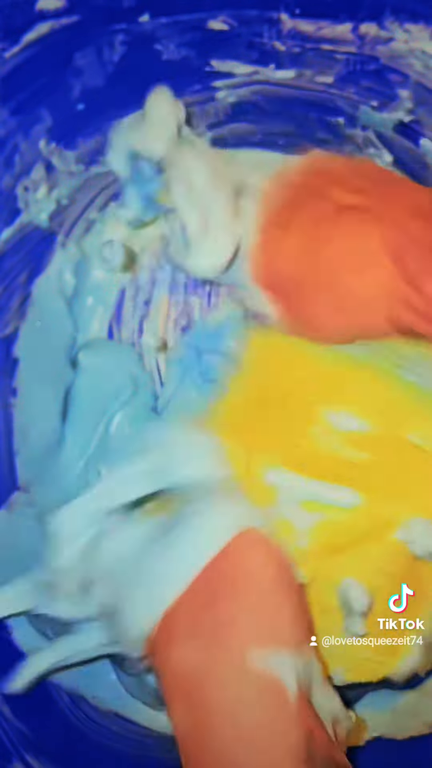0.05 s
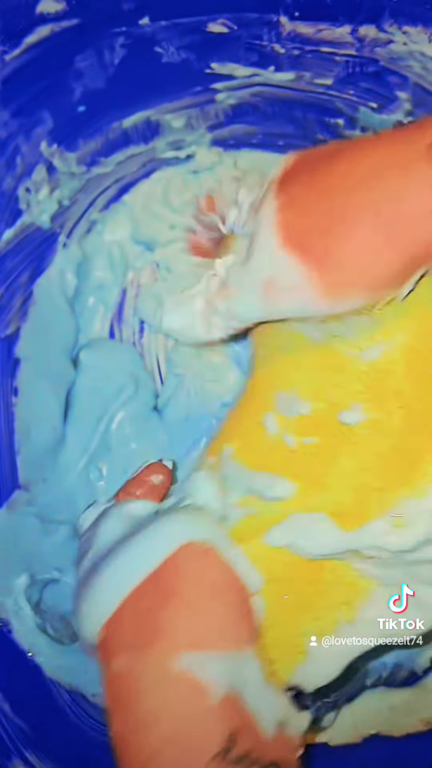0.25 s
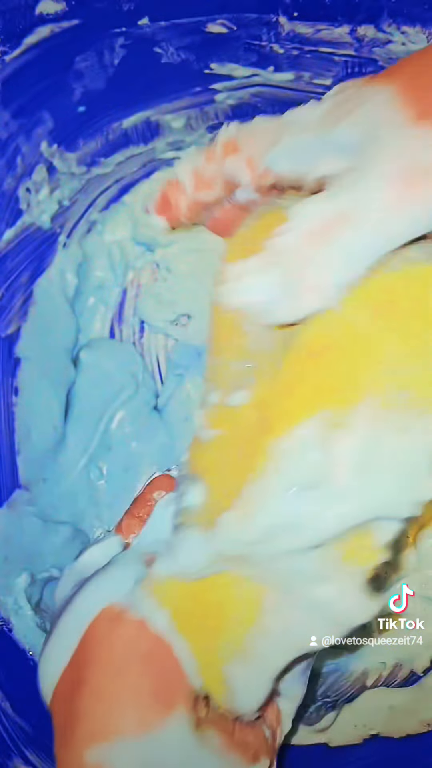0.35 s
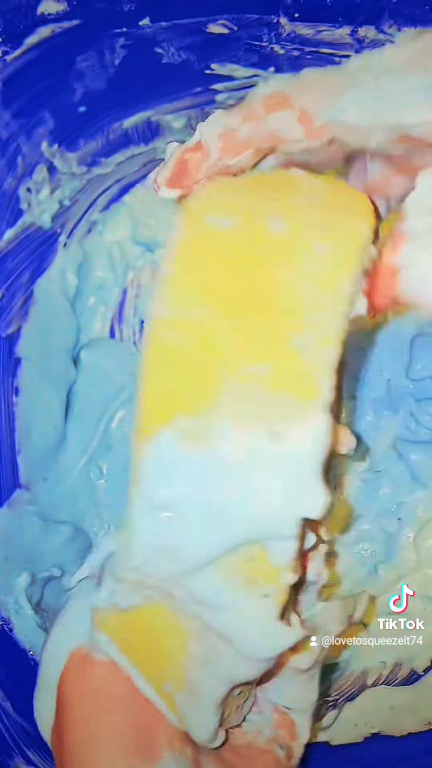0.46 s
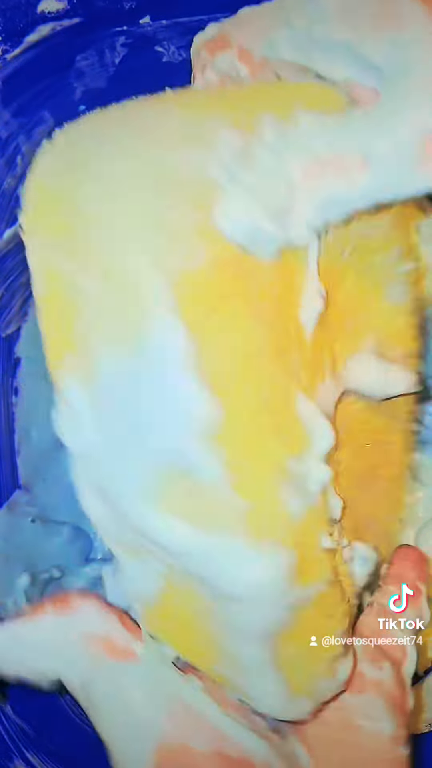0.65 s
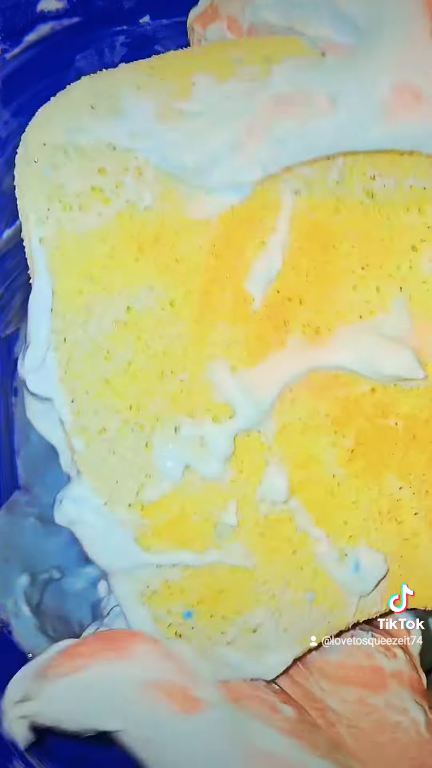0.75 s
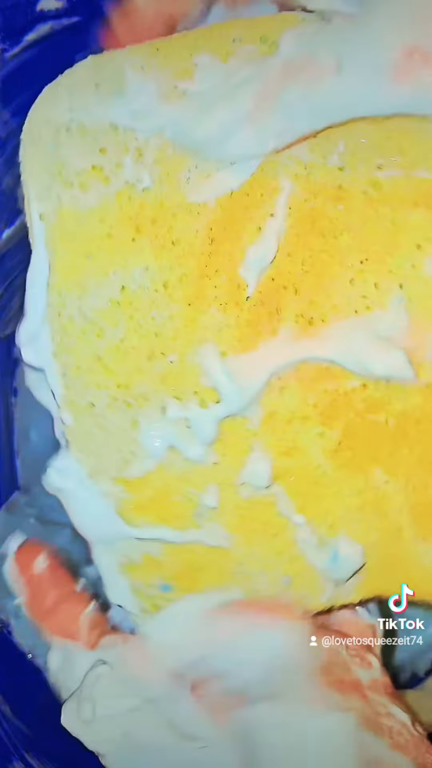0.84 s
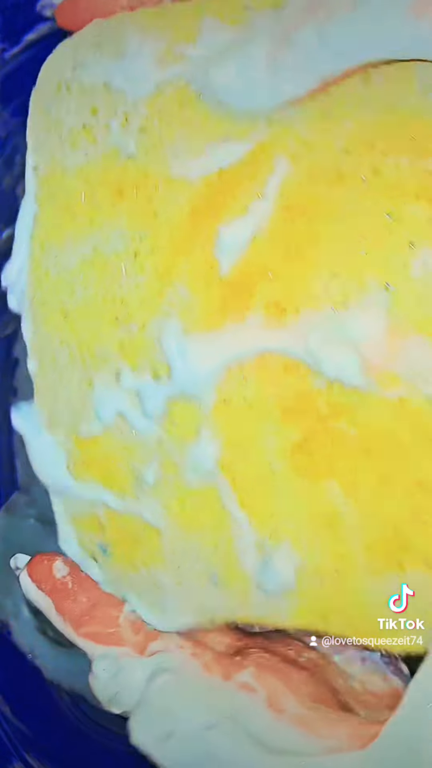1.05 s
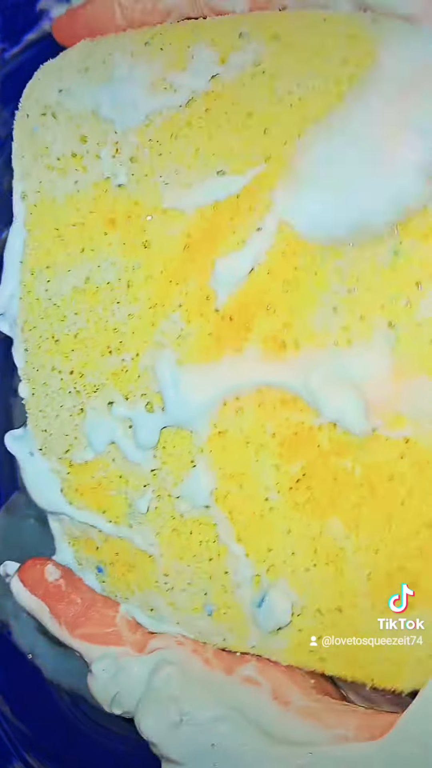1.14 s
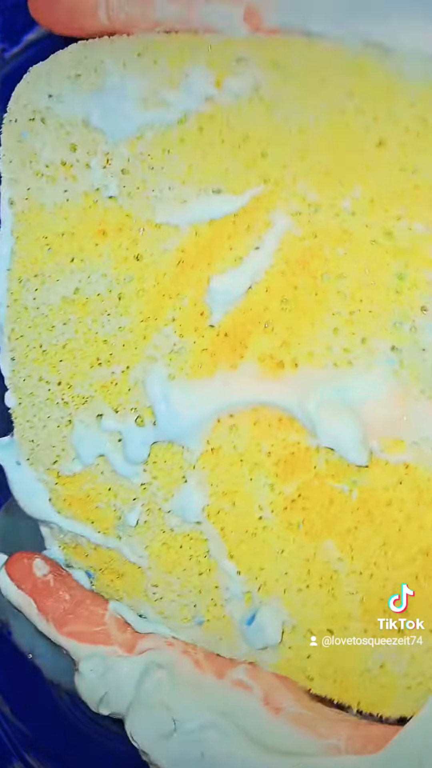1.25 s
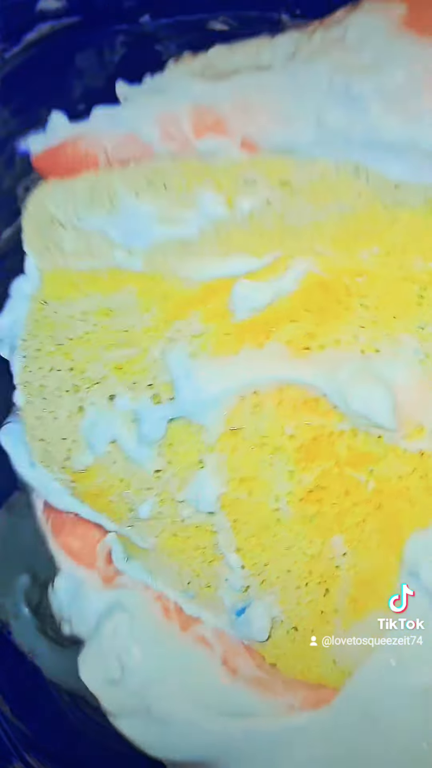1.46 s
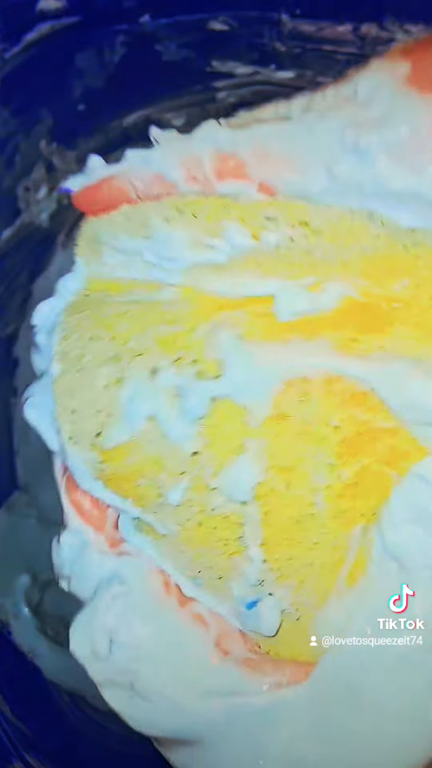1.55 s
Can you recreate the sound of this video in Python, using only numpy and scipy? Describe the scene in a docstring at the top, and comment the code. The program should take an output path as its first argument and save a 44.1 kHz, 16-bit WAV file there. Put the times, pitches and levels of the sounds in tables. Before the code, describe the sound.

Hands squeeze a sudsy sponge with one loud squelch, followed by hollow knocks and soft fizzing.

```python
"""Soapy sponge in a plastic basin.

Wet hands squeeze the sponge close to the microphone: one loud squelch, plops, a thud as it hits bottom.
As the sponge is lifted and turned, the basin rocks and knocks ever more softly; the room booms with it.
Fingers pat; foam fizzes with each move and swells as the next squeeze begins. The room hums faintly."""
import sys
import numpy as np
from scipy import signal
from scipy.fft import rfft, irfft
from scipy.io import wavfile
from scipy.ndimage import uniform_filter1d

SR = 44100
rng = np.random.default_rng(int(sys.argv[2]) if len(sys.argv) > 2 else 0)


def file_out(sig):
    """Save sig as 16-bit WAV at sys.argv[1]."""
    # one column per channel
    cols = np.atleast_2d(sig).T
    # limit, then scale
    lim = np.clip(cols, -1, 1)
    pcm = np.round(lim * 32767).astype(np.int16)
    wavfile.write(sys.argv[1], SR, pcm)


N = 70560
TIME_S, FREQ_HZ = np.arange(N) / SR, np.fft.rfftfreq(N, 1 / SR)

# Flow of suds through the fingers. Each row: time in seconds, spray in dB, gurgle in dB.
SUDS_FLOW = [(.2, -91, -101), (.222, -58, -64), (.233, -40, -36.5), (.243, -35.5, -37), (.256, -30, -36),
             (.268, -36, -33.5), (.28, -40, -37), (.295, -53.5, -39.5), (.318, -53.5, -50),
             (.34, -60.5, -73), (.40, -98, -79.5)]
# Spray and gurgle spectra. Each row: frequency in Hz, relative level in dB.
SPRAY_SPECTRUM = [(300, -34.5), (800, 1), (1400, 6.5), (2400, 6.5), (4000, 7), (5600, 9.5), (7500, 3),
                  (13000, 5.5), (16000, -11)]
GURGLE_SPECTRUM = [(60, -32), (130, -7), (230, -9), (330, -2), (400, -1), (490, -7.5), (590, -6.5),
                   (720, -6.5), (1000, -15), (1500, -15.5), (3000, -26)]
# Air pockets bursting; thin high spits of air. Each row: start in seconds, level in dB, decay in seconds.
POP_BURSTS = [(.2032, -41, .0018), (.2065, -31.5, .00065), (.231, -23, .0009), (.247, -27, .0008),
              (.2535, -22, .0014), (.2562, -24, .0008), (.2625, -21, .0012), (.2697, -23, .0007),
              (.2738, -29, .001), (.2898, -19, .0008), (.3133, -32, .0012)]
SPIT_BURSTS = [(.2028, -31, 0.0029), (1.189, -38.5, 0.0019)]
# Their spectra. Each row: frequency in Hz, relative level in dB.
POP_SPECTRUM = [(200, 5), (900, 8.5), (2500, -5), (5500, 6), (8000, -2), (13000, 1), (16000, 6)]
SPIT_SPECTRUM = [(500, -47), (8000, -7.5), (12500, 0.5), (16000, 0)]
# Basin shaking under the hands. Each row: time in seconds, level in dB.
SHAKE_LEVEL = [(0, -61.5), (.05, -64), (.09, -92), (.21, -72), (.25, -40), (.305, -33), (.33, -37),
               (.37, -51.5), (.45, -43.5), (.85, -62), (.95, -70), (1.15, -69), (1.2, -61), (1.28, -75)]
# Its spectrum. Each row: frequency in Hz, relative level in dB.
SHAKE_SPECTRUM = [(30, -36), (48, -8.5), (66, -0.5), (88, -11), (118, 3), (160, -21.5), (220, -1),
                  (400, -42), (1000, -57)]

# Basin knocks. Each row: start in seconds, relative ring in dB, relative slap in dB, pitch factor.
BASIN_KNOCKS = [(.293, -11, -6, .99), (.317, -14.5, -17, .96), (.394, 1, 4, 1.01),
                (0.4571, -1.5, -5.5, 1.02), (0.5576, -6, -7, 1.02), (0.6458, -11, -13.5, 1.02),
                (0.7157, -13.5, -15, 1.024), (0.7712, -21, -21.5, 1.04)]
# The basin's hollow ring and the room's low boom.
# Each row: base frequency in Hz, relative level in dB, T60 in seconds.
KNOCK_RESONANCES = [(60, -18.5, 0.59), (112.2, 3.5, 0.15), (135.3, 5.5, 0.066), (173, 10, 0.045),
                    (205.7, 0.5, 0.14), (357.5, -11.5, 0.061), (500, -11.5, 0.043), (620.4, -23.5, 0.091),
                    (1043, -35, .13), (1201, -30.5, 0.14)]
# Wet slap spectrum. Each row: frequency in Hz, relative level in dB.
SLAP_SPECTRUM = [(150, -6), (400, -2.5), (650, -0.5), (850, -8), (1200, -8), (1700, -20), (3000, -21.5),
                 (8000, -50)]
# Reflections off nearby surfaces. Each row: delay in seconds, gain.
REFLECTIONS = [(.0046, 0.79), (0.022, 0.45)]

# Air pocket plops and one low thud. Each row: start in seconds, pitch in Hz, level in dB, decay in seconds.
PLOPS_AND_THUD = [(.229, 406, -32.5, 0.0049), (0.2514, 391, -23.5, .011), (.2545, 633.5, -32.5, 0.0083),
                  (.2745, 810, -24.5, 0.0026), (0.284, 420, -40, 0.0052), (0.307, 116, -28.5, 0.024),
                  (0.3911, 529, -36, 0.0063)]
# Finger pats. Each row: start in seconds, level in dB, decay in seconds, cavity in Hz, cavity in dB.
FINGER_PATS = [(0.201, -45, 0.0081, 232, -53), (0.382, -45.5, 0.0043, 486, -54),
               (0.974, -57.5, 0.012, 352, -52.5), (1.052, -48.5, 0.0086, 751, -59)]
# Pat spectrum. Each row: frequency in Hz, relative level in dB.
PAT_SPECTRUM = [(120, 4), (350, 2), (550, 3), (780, -1), (1500, -2), (2400, -6.5), (5000, -13),
                (12000, -25)]

# Fizzing foam; sponge pressed again. Each row: time in seconds, level in dB.
FIZZ_LEVEL = [(0, -58), (.09, -63.5), (.19, -52.5), (.22, -54.5), (.31, -50), (.375, -71.5), (.44, -64.5),
              (.51, -59.5), (.55, -63.5), (.62, -59.5), (.655, -55), (.69, -59), (.77, -57), (.85, -59),
              (.908, -71), (.976, -53.5), (1.04, -63.5), (1.104, -73.5), (1.175, -63.5), (1.235, -55.5),
              (1.30, -68.5), (1.35, -69.5), (1.46, -57), (1.545, -48), (1.6, -47)]
PRESS_LEVEL = [(1.38, -102), (1.47, -69), (1.54, -55), (1.6, -59)]
# Single larger bubbles bursting. Each row: start in seconds, level in dB.
BUBBLE_TICKS = [(.075, -61), (0.399, -47), (.530, -63), (1.1188, -50), (1.164, -42.5), (1.198, -41.5),
                (1.22, -39), (1.319, -47.5), (1.356, -49.5)]
# Fizz, press and tick spectra. Each row: frequency in Hz, relative level in dB.
FIZZ_SPECTRUM = [(200, -40), (500, -6.5), (900, -2), (1600, 0), (2500, 0), (3800, 4), (5500, 3),
                 (7500, -0.5), (13000, -1), (16000, -2)]
PRESS_SPECTRUM = [(200, -58), (450, -27), (750, 1), (1600, -3.5), (2800, -1.5), (6000, -7.5)]
TICK_SPECTRUM = [(500, -7), (2500, -11.5), (5000, 7.5), (8000, 2), (13000, 0), (16000, 8.5)]

# Room hum partials; rumble spectrum. Each row: frequency in Hz, relative level in dB.
HUM_PARTIALS = [(60, -74), (120, -68), (149, -68)]
RUMBLE_SPECTRUM = [(20, -39), (42, -15.5), (68, 4), (95, -13), (125, -7), (155, -3.5), (205, -19),
                   (350, -17.5), (600, -34), (2000, -40), (16000, -67)]
# Swell of hum and rumble. Each row: time in seconds, gain in dB.
DRONE_GAIN = [(.1, -5.5), (.3, -1.5), (1.2, 0), (1.5, -2.5)]

# Microphone port response. Each row: frequency in Hz, left gain in dB, right gain in dB.
PORT_RESPONSE = [(95, -0.7, 2.26), (406, 0.8, 2), (1330, -0.83, 2.5), (4500, -1.5, 0.7), (6840, -1.5, 5),
                 (7360, 3, 12.5), (8260, -2.5, 8.5), (8830, -18, 0.5), (10300, -17, -8), (10830, -5.5, -13),
                 (11650, 2, 0.5), (12430, 12, 1), (13100, 12, 4.5), (13500, 13.5, 5.5), (14500, -1.5, 5),
                 (16100, 10, -9)]
# Likeness of the two ports. Each row: frequency in Hz, correlation from 0 to 1.
PORT_CORRELATION = [(60, 0.96), (300, 0.91), (900, 0.57), (2000, 0.087), (3000, 0.12), (16000, 0.052)]


def squelch():
    """Suds spray, pop, spit and gurgle out of the sponge while the push shakes the basin."""
    spray = bubbles(per_s=1100, spread_db=4.5, burst_s=0.0001, wash=0.2) * level(SUDS_FLOW)
    spray = walls(colour(spray, SPRAY_SPECTRUM), gain=0.76, max_delay_s=0.008)
    gurgle = bubbles(per_s=850, spread_db=1, burst_s=0.0006, wash=0.435) * level(SUDS_FLOW, column=2)
    gurgle = room(colour(gurgle, GURGLE_SPECTRUM), wet_db=-14, t60_s=0.46)
    pops = colour(noise() * bursts(POP_BURSTS, rise_s=0.00031), POP_SPECTRUM)
    spits = colour(noise() * bursts(SPIT_BURSTS, rise_s=0.00055), SPIT_SPECTRUM)
    shake = unit_rms(colour(noise(), SHAKE_SPECTRUM)) * level(SHAKE_LEVEL)
    return room(spray + pops + spits, wet_db=-26, t60_s=0.32) + gurgle + shake


def basin_knocks(ring_db=-26.5, rise_s=0.0092, slap_db=-39.5, slap_t60_s=0.069):
    """Each knock excites the basin's hollow ring and the room's low boom, with a wet slap on top."""
    sag_share, sag_s = 0.489, 0.0043  # pitch starts high, sags as the soft wall relaxes
    ring = np.zeros(N)
    for start_s, db, _, pitch in BASIN_KNOCKS:
        age_s = np.maximum(TIME_S - start_s, 0)
        bent_s = pitch * (age_s + sag_share * sag_s * (1 - np.exp(-age_s / sag_s)))
        modes = sum(amp(mode_db - 60 * age_s / t60_s) * np.sin(2 * np.pi * hz * bent_s)
                    for hz, mode_db, t60_s in KNOCK_RESONANCES)
        ring -= amp(ring_db + db) * np.minimum(age_s / rise_s, 1) * modes
    slap_rows = [(start_s, slap_db + db, slap_t60_s / np.log(1000)) for start_s, _, db, _ in BASIN_KNOCKS]
    slaps = colour(noise(), SLAP_SPECTRUM) * bursts(slap_rows, rise_s=0.00072)
    return room(slaps, wet_db=-7, t60_s=0.4) + room(echoed(ring)[None], wet_db=-22, t60_s=0.36)


def plops_and_thud():
    """Air pockets plop, and a low thud sounds as the push hits bottom."""
    rings = sum(damped_sine(*row, rise_s=0.0017) for row in PLOPS_AND_THUD)
    return room(rings[None], wet_db=-22.5, t60_s=0.2)


def finger_pats():
    """Fingers pat the wet sponge; trapped air rings briefly."""
    slaps = colour(noise(), PAT_SPECTRUM) * bursts([row[:3] for row in FINGER_PATS], rise_s=0.0032)
    rings = sum(damped_sine(start_s, hz, db, decay_s=0.016, rise_s=0.0047)
                for start_s, _, _, hz, db in FINGER_PATS)
    return room(slaps + rings, wet_db=-13, t60_s=0.2)


def foam():
    """Fine bubbles burst as the hands move and press the sponge; larger ones tick singly."""
    fizz = bubbles(per_s=2500, spread_db=4, burst_s=0.000086, wash=1) * level(FIZZ_LEVEL)
    fizz = clusters(colour(fizz, FIZZ_SPECTRUM), depth_db=1.7, width_hz=700, length_s=0.04)
    press = bubbles(per_s=3300, spread_db=0.5, burst_s=0.00058, wash=1) * level(PRESS_LEVEL)
    froth = walls(fizz + colour(press, PRESS_SPECTRUM), gain=0.48, max_delay_s=0.012, count=14)
    tick_envelope = bursts([(start_s, db, 0.0006) for start_s, db in BUBBLE_TICKS], rise_s=0.0001)
    ticks = colour(noise() * tick_envelope, TICK_SPECTRUM)
    return froth + room(ticks, wet_db=2, t60_s=0.049)


def room_drone():
    """Faint hum and rumble of the room."""
    hum = sum(amp(db) * np.sin(2 * np.pi * (hz * TIME_S + rng.random())) for hz, db in HUM_PARTIALS)
    rumble = amp(-64) * unit_rms(colour(noise(), RUMBLE_SPECTRUM))
    return level(DRONE_GAIN) * (hum + rumble)


def bubbles(per_s, spread_db, burst_s, wash):
    """Tiny bursts of random size over a wash of countless smaller ones."""
    sizes = amp(spread_db * np.minimum(rng.exponential(1, N), 4))
    onsets = rng.random(N) < per_s / SR
    power = signal.lfilter([1], [1, -np.exp(-2 / (burst_s * SR))], (sizes * onsets) ** 2)
    envelope = np.sqrt(power / power.mean() + wash ** 2)
    return unit_rms(correlate_ports(envelope * rng.standard_normal((2, N))))


def clusters(x, depth_db, width_hz, length_s):
    """Like bubbles burst together, so narrow bands swell and fade at random."""
    bins_hz, frames_s, spectra = signal.stft(x, SR, nperseg=512)
    swell = rng.standard_normal(spectra.shape[1:])
    swell = uniform_filter1d(swell, max(1, round(width_hz / bins_hz[1])), axis=0)
    swell = uniform_filter1d(swell, max(1, round(length_s / frames_s[1])), axis=1)
    gains = unit_rms(amp(depth_db * unit_rms(swell)))
    return signal.istft(spectra * gains, SR)[1][:, :N]


def damped_sine(start_s, hz, db, decay_s, rise_s):
    """One briefly ringing resonance."""
    return bursts([(start_s, db, decay_s)], rise_s) * np.sin(2 * np.pi * hz * (TIME_S - start_s))


def bursts(rows, rise_s):
    """Envelope of linear rises and exponential decays."""
    envelope = np.zeros(N)
    for start_s, db, decay_s in rows:
        age_s = np.maximum(TIME_S - start_s, 0)
        envelope += amp(db) * np.minimum(age_s / rise_s, 1) * np.exp(-age_s / decay_s)
    return envelope


def walls(x, gain, max_delay_s, count=7):
    """Close reflections between hands and basin walls, different at each port."""
    delays_s = rng.uniform(0.000612, max_delay_s, (2, count, 1))
    signs = rng.choice([-1, 1], (2, count, 1))
    paths = signs * np.exp(-2j * np.pi * FREQ_HZ * delays_s)
    response = 1 + gain / np.sqrt(count) * paths.sum(1)
    return irfft(rfft(x) * response, N) / np.sqrt(1 + gain ** 2)


def echoed(x):
    """Adds first reflections from nearby surfaces."""
    return x + sum(gain * np.interp(TIME_S - delay_s, TIME_S, x, left=0) for delay_s, gain in REFLECTIONS)


def room(x, wet_db, t60_s):
    """Adds the short tail of a small room."""
    age_s = TIME_S[:SR // 2]
    tail = rng.standard_normal((2, len(age_s))) * amp(-60 * age_s / t60_s) * np.minimum(age_s / 0.0017, 1)
    tail /= np.linalg.norm(tail, axis=1, keepdims=True)
    return x + amp(wet_db) * signal.fftconvolve(x, tail, axes=1)[:, :N]


def noise():
    """White noise at both ports."""
    return correlate_ports(rng.standard_normal((2, N)))


def correlate_ports(x):
    """Makes two unrelated signals alike in the bass, as at two close ports."""
    left, other = rfft(x)
    likeness = np.clip(over_frequency(PORT_CORRELATION), 0, 1)
    right = likeness * left + np.sqrt(1 - likeness ** 2) * other
    return irfft(np.array([left, right]), N)


def colour(x, spectrum):
    """Filters by a spectrum, keeping the power of white noise."""
    return irfft(rfft(x) * unit_rms(amp(over_frequency(spectrum))), N)


def over_frequency(table, column=1):
    """A column interpolated over log frequency."""
    rows = np.array(table)
    return np.interp(np.log(FREQ_HZ + 1), np.log(rows[:, 0]), rows[:, column])


def level(table, column=1):
    """A dB column as gain over time."""
    rows = np.array(table)
    return amp(np.interp(TIME_S, rows[:, 0], rows[:, column]))


def amp(db):
    """Decibels to gain."""
    return 10 ** (np.asarray(db) / 20)


def unit_rms(x):
    """Scales to rms 1."""
    return x / np.sqrt(np.mean(x ** 2) + 1e-20)


def scene():
    """Sponge, basin and foam over the room's drone."""
    return squelch() + basin_knocks() + plops_and_thud() + finger_pats() + foam() + room_drone()


def record(dry):
    """Each port has its own treble peaks and notch; the left lags slightly; then band limits."""
    left_lag_s, low_cut_hz, high_cut_hz = 0.00008, 27, 15900
    gains = amp([over_frequency(PORT_RESPONSE, 1), over_frequency(PORT_RESPONSE, 2)])
    lag = np.exp(-2j * np.pi * FREQ_HZ * np.array([[left_lag_s], [0]]))
    heard = irfft(rfft(dry) * gains * lag, N)
    highpass = signal.butter(4, low_cut_hz, "high", fs=SR, output="sos")
    lowpass = signal.firwin(511, high_cut_hz, window=("kaiser", 9), fs=SR)
    return signal.oaconvolve(signal.sosfilt(highpass, heard), lowpass[None], "same")


dry = scene()
out = record(dry)
file_out(out)
```